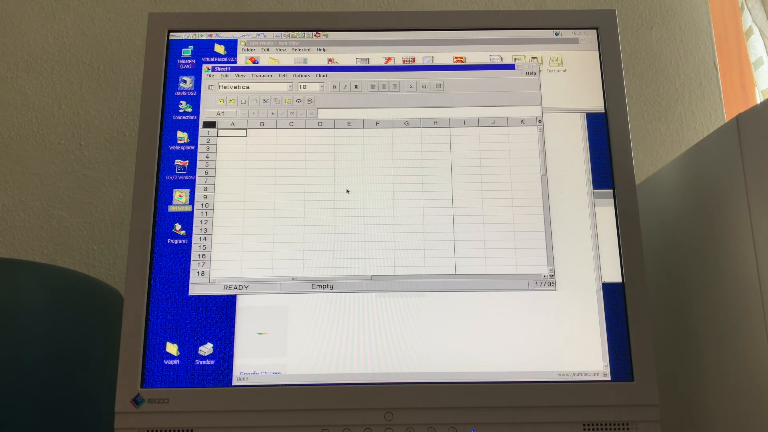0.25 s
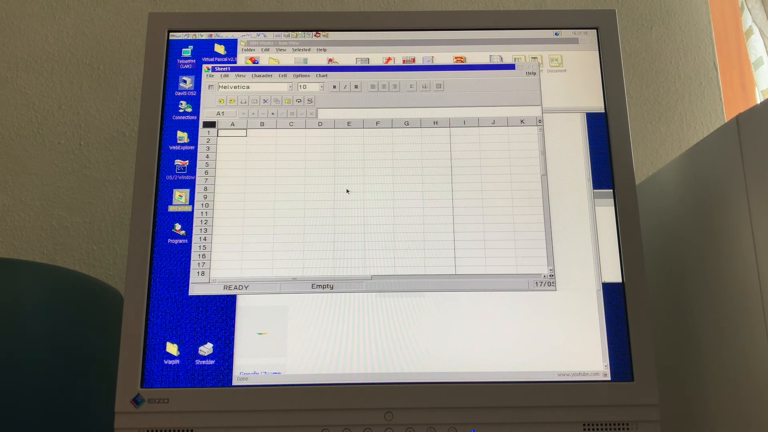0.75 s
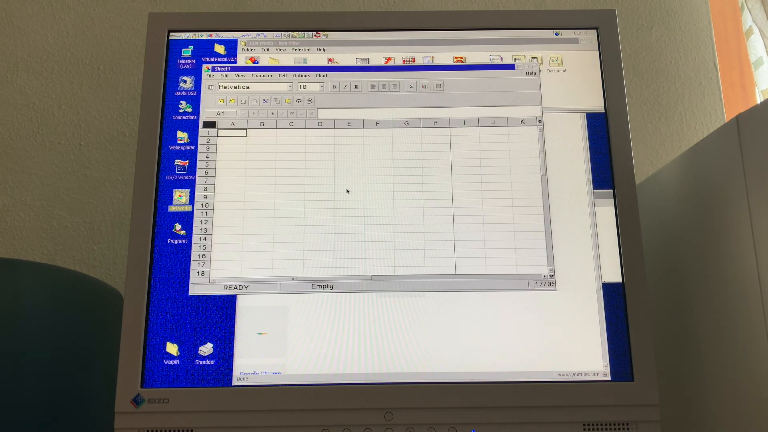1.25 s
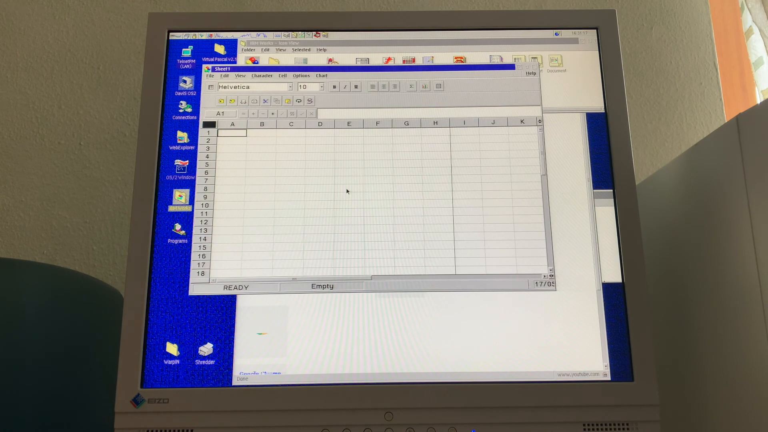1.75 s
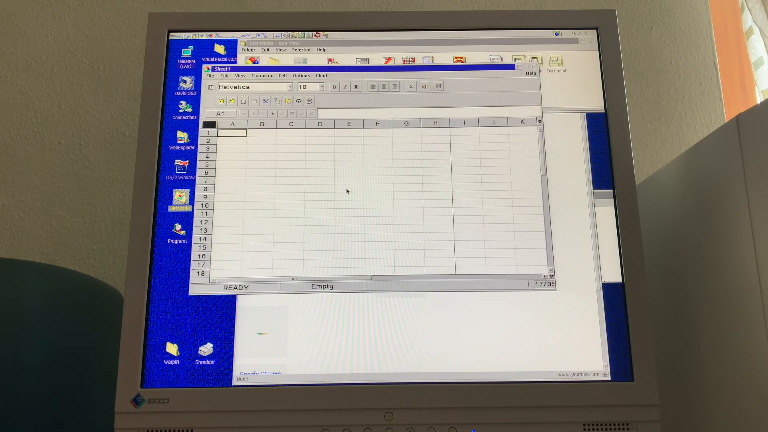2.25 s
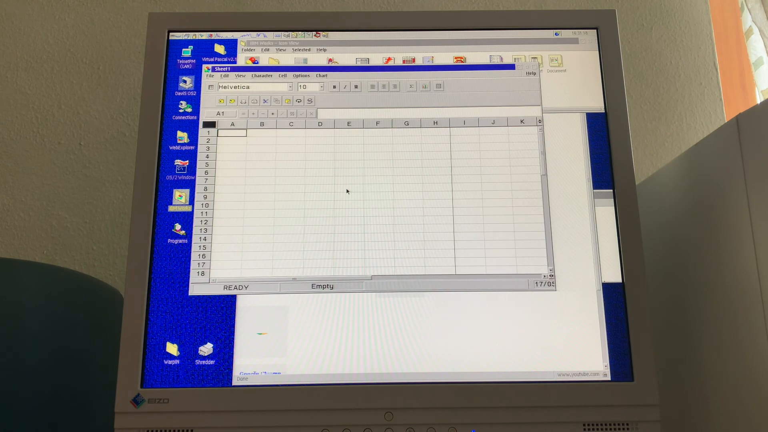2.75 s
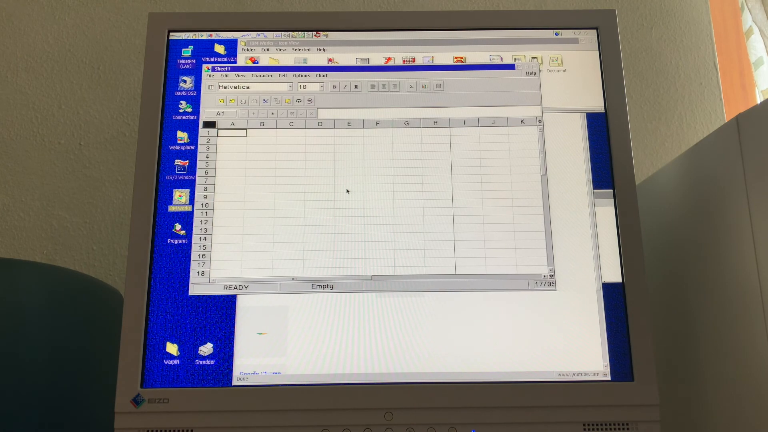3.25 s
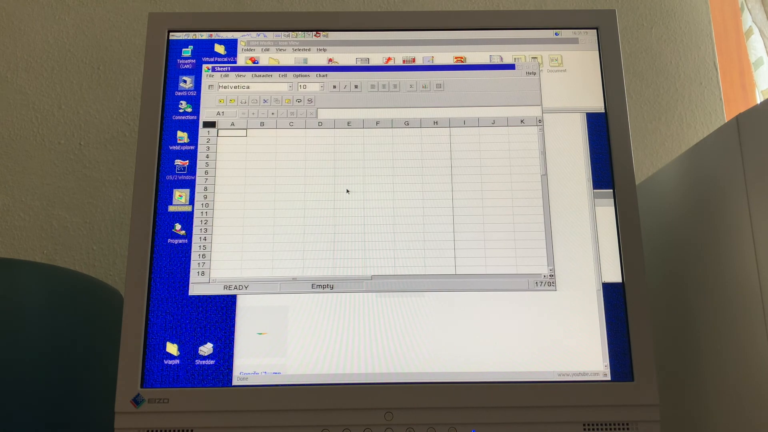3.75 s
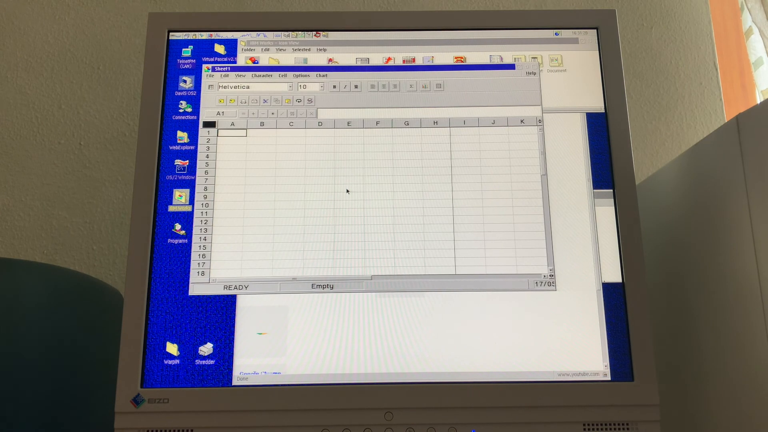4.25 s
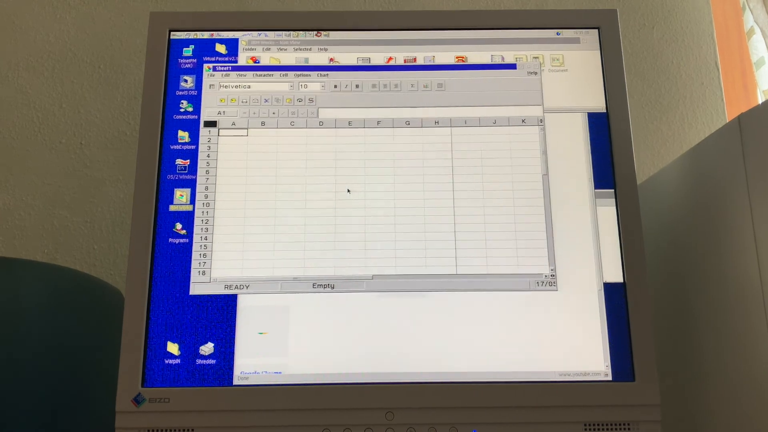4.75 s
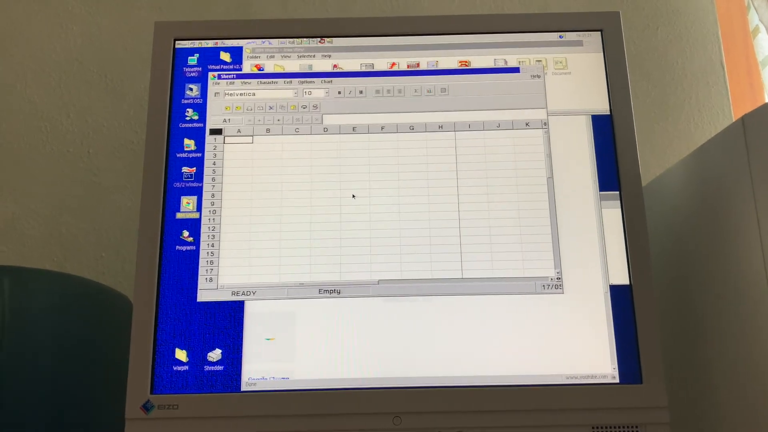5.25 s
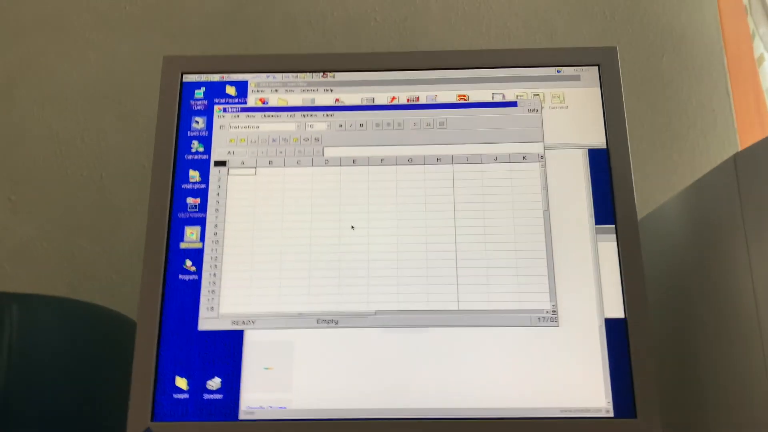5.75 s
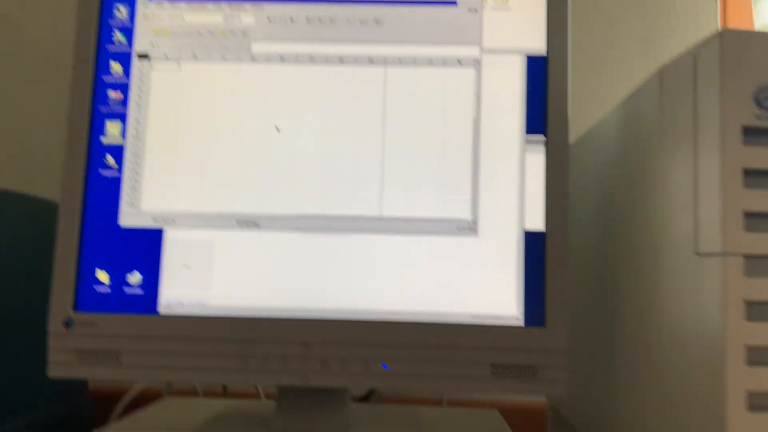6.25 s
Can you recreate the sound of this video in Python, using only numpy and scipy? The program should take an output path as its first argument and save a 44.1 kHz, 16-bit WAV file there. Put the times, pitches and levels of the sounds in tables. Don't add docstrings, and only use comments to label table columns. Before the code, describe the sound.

In a quiet room, a computer case beside a monitor whirs continuously: soft airy fan rush, low hum, glassy high whine and hiss that beats slowly. A drive ticks once early on. Later the hand holding the microphone shifts, giving small snaps, rubs and a dull thump. Finally the microphone swings towards the case, the whine grows brighter and stronger, and a hard rub with sharp clicks closes it.

```python
import sys
import numpy as np
from scipy import signal
from scipy.fft import rfft, irfft
from scipy.io import wavfile
from scipy.ndimage import uniform_filter1d

SR = 44100
rng = np.random.default_rng(int(sys.argv[2]) if len(sys.argv) > 2 else 0)


def to_wav(s):
    ch = np.atleast_2d(s).T
    pcm = np.round(np.clip(ch, -1, 1) * 32767)
    wavfile.write(sys.argv[1], SR, pcm.astype(np.int16))


def gain_from_db(level_db):
    decades = np.asarray(level_db, float) / 20
    return 10 ** decades


N = 287091
T = np.arange(N) / SR
HZ = np.fft.rfftfreq(N, 1 / SR)

# peak_s, level_db, pitch_hz, half_length_s
BUILDING_BUMPS = [
    (1.12, -47.5, 59, .12),
    (1.46, -53, 48, 0.092),
    (3.5, -49, 82, 0.049),
    (4.25, -49.5, 62, 0.14),
    (3.85, -52, 62.5, .1),
    (5.72, -48, 76.5, 0.065),
    (1, -52, 137, 0.045),
]
# pitch_hz, density_db_per_hz
RUMBLE = [(25, -104), (38, -73.5), (60, -75.5), (90, -79.5), (110, -77), (165, -74), (210, -83), (245, -83),
          (300, -92.5), (350, -102)]
# pitch_hz, width_hz, level_db
ROOM_TONES = [(66.4, 15, -65.5), (46.7, 5, -70.5), (137, 2.9, -72), (195, 6.5, -70.5), (222.4, 17, -72.5),
              (289, 41, -75.5)]
# time_s, level_db
SWELL = [(0, -6), (.7, -5), (1.1, -3), (1.5, -4), (1.9, -4.5), (2.9, -9.5), (3.7, -5), (4.1, -2), (4.5, -5),
         (4.8, -12), (5.2, -3.5), (5.75, -3), (6.1, -8), (6.51, -3)]
# pitch_hz, level_db
SHAFTS = [(71.4, -67), (90.2, -61), (120.1, -66), (158.3, -71), (166.9, -66), (200, -74), (217.7, -68),
          (236.1, -66), (308, -78)]

# time_s, share_0_to_1
TURN = [(0, 0), (4.45, 0), (4.75, 1), (5.7, 1), (6.2, 0), (6.51, 0)]
# time_s, share_0_to_1
NEARNESS = [(0, 0.01), (5.75, 0), (5.95, 0.2), (6.2, 0.85), (6.51, 1)]
# pitch_hz, lead_radians
LEAD = [(30, .5), (250, .65), (430, 1.4), (750, 3.3), (950, 5.2), (1300, 7.7), (2050, 7.9), (2650, 9.3),
        (2800, 9.6), (2950, 9.55), (3100, 9.55), (3250, 9.9), (3500, 10.6), (3850, 10.7), (4080, 12.3),
        (4500, 12.6), (5000, 13.4), (5400, 13.2), (5700, 14.1), (6100, 12.9), (6900, 13.5), (7350, 14.2),
        (7580, 14.5), (7800, 15.1), (8100, 15.5), (8300, 15.48), (8500, 15.7), (8800, 16.17), (9050, 16.05),
        (9400, 16.7), (9580, 16.4), (9750, 17.4), (10000, 17.3), (10800, 18.85), (11400, 19.95),
        (12600, 21), (12950, 21.9), (13850, 22.1), (14120, 22.7), (14300, 22.4), (14500, 23.1),
        (15000, 25.1)]
# pitch_hz, likeness_0_to_1
LIKENESS = [(60, .97), (250, .93), (700, .4), (1100, .15), (1500, .62), (2200, .7), (2560, .58), (2700, .4),
            (2850, .8), (3050, .66), (3300, .8), (3900, .35), (4300, .62), (4900, .3), (5400, .3),
            (6800, .55), (8000, .96), (9000, .96), (9650, .45), (10900, .97), (12200, .85), (13000, .97)]
# pitch_hz, left_minus_right_db
TILT = [(250, 0), (600, -1), (950, -7), (1300, -4), (1700, -1), (3000, 0), (4000, -1.5), (4500, -.5),
        (5250, -4.5), (5700, -3), (6000, -1), (6250, -3), (7000, 0)]
# pitch_hz, level_db, extra_lead_radians
NEAR = [(1500, 0, 0), (2350, -1, -.6), (2520, -6, -1.6), (2700, 0, -1.8), (3100, -1, -1.9), (3350, 0, -2.1),
        (3700, 2, -1.5), (3950, 1, -4.4), (4200, 1, -2.4), (4450, -3, -1.6), (4750, -2, -3.1),
        (5100, 0, -4), (5400, 1, -3.9), (5750, -4, -2), (6050, 2, -1.5), (6300, 0, -.7), (7250, -1, -.6),
        (7650, 8, -.2), (7900, -5, 0), (8700, -1, 0), (9400, 4, 0), (10400, 4, 0), (11200, 1, .4),
        (11900, 0, 0), (12400, 2, 0), (13450, -5, 0), (14050, -9, 0), (14400, 5, 0), (15100, 0, 0),
        (15250, -14, 0)]
# pitch_hz, left_db, right_db
SHADE = [(1130, 0.5, 0), (1670, 2, 3), (2200, 3, 2.5), (2600, 1.5, 2.5), (3350, -3.5, 3), (3750, -2, 3),
         (4400, -4, 4.5), (5000, -1, 5.5), (5500, -10, 1.5), (6030, -25, 5.5), (7100, 1, 0)]

# peak_s, level_db, pitch_hz, half_length_s
THUMPS = [
    (5.499, -32, 62, .017),
    (6.4855, -36, 110, .006),
]
# ping_peak_s, ping_db, knock_db, knock_hz, knock_delay_s
SNAPS = [(4.6145, -42, -38, 230, .007), (4.7195, -32, -42, 520, .005), (4.838, -50, -32, 450, .0035),
         (4.8445, -60, -43, 170, .002), (5.0115, -39, -33, 330, .0015), (5.065, -46, -48, 300, .003),
         (5.467, -54, -44, 540, .001), (4.515, -56, -47, 220, .001), (4.369, -48, -50, 520, -.003),
         (4.389, -51, -50, 330, .002), (4.422, -50, -52, 300, .003), (5.551, -49, -52, 480, .003),
         (5.300, -51, -43, 470, .001), (6.474, -37, -39, 350, .001), (6.4782, -25.5, -28, 170, -.0008),
         (6.494, -33, -33, 150, .006), (6.5017, -37, -33, 330, .0001), (6.5085, -37, -50, 300, -.002)]
# time_s, level_db
RUBS = [
    [(4.355, -78), (4.367, -47.5), (4.43, -55), (4.47, -56.5), (4.537, -51.5), (4.56, -67)],
    [(5.45, -65), (5.468, -55), (5.484, -61), (5.514, -55), (5.59, -60), (5.61, -78)],
    [(6.467, -74), (6.471, -42), (6.476, -37.5), (6.51, -40.5)],
    [(5.47, -66), (5.5, -56), (5.588, -57.5), (5.602, -79)],
]
# pitch_hz, level_db
RUB_COLOUR = [(90, -23), (200, 2.5), (550, 13), (700, -5.5), (900, 8.5), (1150, -0.5), (1500, 3.5)]
# pitch_hz, width_hz, level_db
RUB_FOCUS = [(795, 220, 16.5), (548, 140, 19), (750, 180, 12), (1090, 580, 16)]

# start_s, level_db, length_s
TICK = [
    (2.3034, -40.5, 0.0018),
    (2.3067, -50, 0.0083),
    (2.317, -52, .005),
]
# pitch_hz, width_hz, level_db
CASE = [(1000, 480, -3.5), (1860, 90, 5), (2620, 180, -3), (3100, 160, -1), (3500, 230, -1),
        (4000, 300, -8), (4370, 300, -3), (4750, 250, -6), (5720, 500, -10.5), (7000, 600, -5)]

# pitch_hz, density_db_per_hz
RUSH = [(200, -96), (360, -98), (500, -91), (680, -95), (900, -91), (1090, -97), (1300, -93), (1700, -92.5),
        (1900, -94.5), (2200, -89.5), (2480, -95), (2700, -96), (2900, -95), (3200, -97.5), (3700, -98),
        (4300, -102.5), (4550, -107), (4900, -106), (5300, -104), (5600, -109.5), (5900, -112.5),
        (6300, -112), (6600, -107)]
# pitch_hz, level_db
BLADE = [(472.6, -67), (944.8, -69)]
# pitch_hz, width_hz, level_db
BLADE_HUMPS = [(466.5, 53, -72.5), (643, 6.1, -78)]
# pitch_hz, level_db
FAN_TONES = [(471, -66), (945, -68), (1244, -76), (1402, -78), (1558, -75), (1583, -72), (1607, -76),
             (1674, -80), (1747, -77), (2151, -61), (2318, -76), (2387, -77), (2409, -76), (2525, -72),
             (2894, -82), (2977, -78), (3004, -77), (3063, -72), (3117, -75), (3456, -78), (3561, -80),
             (4673, -83), (4702, -87), (4861, -86), (5192, -83), (1949, -76), (2090, -77), (2338, -75),
             (2672, -79)]

# pitch_hz, density_db_per_hz
HISS = [(5200, -112), (6000, -112), (6400, -107.5), (6700, -100.5), (7100, -97), (7650, -97), (7900, -106),
        (8150, -99), (8700, -96), (9600, -101), (10400, -98), (11000, -98.5), (12300, -89), (13300, -95),
        (14000, -97), (14200, -107), (14350, -108), (14550, -102), (14800, -112), (15050, -107),
        (15400, -103), (15720, -102)]
# multiple_of_slot_rate, then level_db at each of the five sidebands
WHINE = [(11, -100, -84, -78, -81, -100), (12, -100, -80, -81, -82, -100), (13, -100, -73, -73, -82, -100),
         (14, -100, -88, -59, -76, -100), (15, -86, -88, -75, -77, -100), (16, -87, -71, -71, -74, -84),
         (17, -86, -66, -66, -76, -82), (18, -91, -72, -75, -76, -100), (19, -100, -78, -73, -80, -100),
         (20, -84, -71, -87, -71, -90), (21, -83, -75, -85, -88, -100), (22, -84, -83, -79, -71, -100),
         (23, -81, -62, -74, -71, -100), (24, -77, -70, -75, -70, -85), (25, -100, -73, -79, -72, -100),
         (26, -100, -71, -78, -80, -100), (27, -97, -80, -85, -76, -100), (28, -100, -89, -100, -85, -100),
         (29, -100, -93, -100, -78, -100)]
SLOT_HZ, SIDEBANDS_HZ = 519.25, [-158.4, -72.3, 0, 72.3, 158.4]
# pitch_hz, level_db
SECOND_DRIVE = [(5860, -86), (7082, -78), (7596, -73), (7666, -80), (7738, -81), (7873, -82), (8220, -76),
                (8627, -79), (9114, -79), (9160, -80), (9410, -75), (9534, -82), (9927, -80), (10199, -78),
                (10301, -76), (10446, -74), (10573, -80), (11092, -83), (11483, -76), (11612, -73),
                (11633, -73), (11754, -71), (11857, -64), (12029, -72), (12376, -68), (12546, -71),
                (12651, -71), (12896, -74), (14077, -76), (15114, -84)]
# peak_s, level_db, pitch_hz, half_length_s
BEAMS = [(6.15, -64, 3060, 0.24), (6.16, -66, 6232, 0.11), (6.32, -67, 6680, 0.21), (6.08, -60, 7530, 0.24),
         (6.21, -56, 7790, 0.12), (6.07, -59, 8308, 0.09), (6.42, -65, 8380, 0.19), (5.87, -62, 8828, 0.24),
         (6.32, -67, 8898, 0.16), (6.36, -64, 9347, 0.16), (6.4, -60, 9418, 0.08), (6.32, -64, 9793, 0.17),
         (6.03, -61, 10834, 0.2), (6.15, -63, 10978, 0.27), (6.41, -64, 11351, 0.09),
         (6.05, -63, 11497, 0.19), (5.86, -60, 12011, 0.1), (6.39, -59, 12391, 0.19),
         (6.06, -58, 12537, 0.1), (5.84, -67, 12799, 0.16), (6.46, -62, 12906, 0.04),
         (6.36, -63, 13053, 0.12)]
BEATS_HZ = [2005, 2150, 7266]
# pitch_hz, level_db, in_step_s
SPINDLES = [
    [(2002.01, -73.5, 2.9), (2002.45, -62.0, 2.995), (2003.64, -59.0, 2.745), (2004.07, -64.0, 2.972),
     (2004.38, -62.0, 2.972), (2006.78, -75.5, 3.1), (2007.31, -64.0, 2.924), (2007.58, -66.0, 2.852)],
    [(2147.12, -72.5, 3.113), (2148.29, -73.0, 3.014), (2148.76, -68.0, 2.698), (2149.06, -70.0, 3.119),
     (2149.6, -77.0, 4.245), (2151.8, -78.0, 3.179), (2151.98, -68.0, 2.858), (2152.4, -68.0, 2.891)],
    [(7261.67, -69.0, 3.002), (7265.02, -73.0, 2.809), (7267.25, -67.0, 2.945), (7267.85, -72.0, 3.054),
     (7267.93, -72.0, 2.848), (7268.44, -69.5, 2.86), (7269.76, -62.5, 2.885), (7270.05, -71.5, 2.974),
     (7274.73, -78.5, 2.985), (7276.36, -75.0, 2.96), (7279.83, -79.0, 2.986)],
]
GROUP_DB, GROUP_TURNED_DB, GROUP_NEAR_DB = [0.5, 0.9, 0], [4, 1, -1], [6.5, 10.5, 4.5]


def evened(x):
    return x / np.sqrt(np.mean(x ** 2) + 1e-20)


def read(points, hz):
    f, value = np.transpose(points)
    return np.interp(np.log(hz + 1), np.log(f + 1), value)


def columns(rows):
    s, *values = np.transpose(rows)
    if s[0] > 1:
        return [np.interp(T, s, v, left=-120, right=-120) for v in values]
    return [np.interp(T, s, v) for v in values]


def add(mix, s, sound):
    part = mix[round(s * SR) - len(sound) // 2:][:len(sound)]
    part += sound[:len(part)]


def patchy_noise(patch_db):
    frames, hz = N // 256 + 5, np.fft.rfftfreq(1024, 1 / SR)
    a, b, c, d, patches = rng.standard_normal((frames, 513, 5)).T
    patches = uniform_filter1d(patches, size=10, axis=0)
    patches = evened(uniform_filter1d(patches, size=12, axis=1))
    same = np.clip(read(LIKENESS, hz), 0, 1)[:, None]
    left = a + 1j * b
    right = same * left + np.sqrt(1 - same ** 2) * (c + 1j * d)
    z = np.array([left, right]) * gain_from_db(patch_db * patches)
    return evened(signal.istft(z, nperseg=1024, noverlap=768)[1][:, :N])


def coloured(x, colour):
    inside = (HZ > colour[0][0]) & (HZ < colour[-1][0])
    return irfft(rfft(x) * gain_from_db(read(colour, HZ)) * inside * np.sqrt(SR / 2), N)


def humps(white, peaks):
    density = sum(gain_from_db(db) ** 2 / w / (1 + (2 * (HZ - f) / w) ** 4) for f, w, db in peaks)
    return irfft(rfft(white) * np.sqrt(density * SR / 2), N)


def tones(lines, partner_db, spread_hz, count=7):
    spectrum, partner = np.zeros(len(HZ), complex), np.arange(count) > 0
    for (hz, db), (place, size, phase) in zip(lines, rng.random((len(lines), 3, count))):
        shares = gain_from_db(partner * (partner_db - 6.7 * size))
        shares = shares / np.linalg.norm(shares)
        pitches = hz + spread_hz * partner * (2 * place - 1)
        bins = np.round(pitches * N / SR).astype(int)
        np.add.at(spectrum, bins, gain_from_db(db) * shares * np.exp(2j * np.pi * phase))
    return irfft(spectrum, N) * N / np.sqrt(2)


def wavelet(db, hz, half_s):
    t = np.arange(-SR // 4, SR // 4) / SR
    return gain_from_db(db) * np.exp(-(t / half_s) ** 2) * np.cos(2 * np.pi * hz * t)


def knock(db, hz, cycles, sharpness):
    age = np.maximum(1 + np.arange(-SR // 20, SR // 20) / SR * hz / cycles, 1e-3)
    swell = (age * np.exp(1 - age)) ** sharpness
    return gain_from_db(db) * swell * np.cos(2 * np.pi * cycles * np.log(age))


def panned(pair, db):
    return pair * gain_from_db(np.array([db / 2, -db / 2]))


def ports(spectrum, near=0):
    f, radians = np.transpose(LEAD)
    near_f, near_db, near_radians = np.transpose(NEAR)
    lead = np.interp(HZ, f, radians) + near * np.interp(HZ, near_f, near_radians)
    colour = gain_from_db(near * np.interp(HZ, near_f, near_db))
    tilt_db = read(TILT, HZ) / 2
    return irfft(spectrum * colour * np.array([gain_from_db(tilt_db), gain_from_db(-tilt_db) * np.exp(1j * lead)]), N)


def approached(x):
    share, spectrum = np.clip(columns(NEARNESS)[0], 0, 1), rfft(x)
    return sum(np.maximum(1 - 2 * abs(share - near), 0) * ports(spectrum, near) for near in (0, .5, 1))


def shaded(pair, turn):
    f, *db = np.transpose(SHADE)
    gains = gain_from_db(np.array([np.interp(HZ, f, d) for d in db]))
    return pair + turn * irfft(rfft(pair) * (gains - 1), N)


def through_housing(pair):
    left, right = pair
    return np.array([left, np.append(right[12:], right[-12:][::-1])])


def building_bumps():
    bumps = np.zeros(N)
    for s, *bump in BUILDING_BUMPS:
        add(bumps, s, wavelet(*bump))
    return bumps


def room_rumble(white):
    desk_hum = tones([(58.3, -53)], partner_db=-10.5, spread_hz=1.5)
    rumble = coloured(white, RUMBLE) + humps(white, ROOM_TONES) + desk_hum
    return gain_from_db(columns(SWELL)[0]) * rumble + tones(SHAFTS, partner_db=-17.5, spread_hz=1.5)


def grip_snaps():
    snaps, ping_hz = np.zeros(N), 960
    for s, *thump in THUMPS:
        add(snaps, s, wavelet(*thump))
    for s, ping_db, knock_db, knock_hz, delay in SNAPS:
        add(snaps, s, wavelet(ping_db, ping_hz, 1.66 / ping_hz))
        add(snaps, s + delay, knock(knock_db, knock_hz, cycles=1.26, sharpness=6.8))
    return snaps


def skin_rubs():
    grain_db = 2.2 * rng.exponential(1, N // 64 + 1).repeat(64)[:N]
    grains = rng.standard_normal((2, N)) * gain_from_db(grain_db)
    grains = grains + 2.5 * grains.sum(0)
    spectrum = rfft(evened(coloured(grains, RUB_COLOUR)))
    rubs = np.zeros((2, N))
    for (f, w, db), rub in zip(RUB_FOCUS, RUBS):
        focus = gain_from_db(db / (1 + (2 * (HZ - f) / w) ** 2))
        rubs += evened(irfft(spectrum * focus, N)) * gain_from_db(columns(rub)[0])
    return rubs


def drive_tick():
    noise = rng.standard_normal((3, N))
    start_s, start_db, _ = TICK[0]
    cracks = sum((T > s) * gain_from_db(db) * np.exp(-((T - s) / length) ** 2) for s, db, length in TICK)
    ring = (T > start_s) * gain_from_db(start_db - 5.5 - 60 * abs(T - start_s) / 0.083)
    case = sum(gain_from_db(db) / (1 + (2 * (HZ - f) / w) ** 2) for f, w, db in CASE)
    return 2 * irfft(rfft((noise[0] + 1.15 * noise[1:]) * (cracks + ring)) * case, N)


def fans(white, turn, near):
    lines = [line for line in FAN_TONES if abs(line[0] - BEATS_HZ[1]) > 9 and line[0] > 1000]
    steady = tones(lines, partner_db=-2.0, spread_hz=5.0) + tones(BLADE, partner_db=-16, spread_hz=1.1)
    air = coloured(white, RUSH) + humps(white, BLADE_HUMPS)
    return gain_from_db(0.82 + 0.2 * turn + 2 * near) * (air + steady)


def spindle_group(group, shift_hz=0):
    centre_hz, slow = BEATS_HZ[group], T[::32]
    beat = sum(gain_from_db(db) * np.exp(2j * np.pi * (hz - centre_hz) * (slow - s)) for hz, db, s in SPINDLES[group])
    carrier = np.exp(2j * np.pi * (centre_hz + shift_hz) * T)
    return np.sqrt(2) * (np.interp(T, slow, beat) * carrier).real


def drive_whine(white, near):
    lines = [(k * SLOT_HZ + side, db) for k, *row in WHINE for side, db in zip(SIDEBANDS_HZ, row)]
    lines = [line for line in lines if abs(line[0] - BEATS_HZ[2]) > 9]
    steady = tones(lines + SECOND_DRIVE, partner_db=-1.0, spread_hz=8.0)
    copies = spindle_group(2, -158.3) * gain_from_db(-11.5) + spindle_group(2, 158.3) * gain_from_db(-16)
    return gain_from_db(1.58 + 2.5 * near) * (coloured(white, HISS) + steady + copies)


def beams():
    late = T[T > 5.2]
    flares = sum(gain_from_db(db - 6) * np.exp(-((late - s) / half_s) ** 2) * np.cos(2 * np.pi * hz * late)
                 for s, db, hz, half_s in [*BEAMS, (5.95, -67, 4673, .07)])
    return np.sqrt(2) * np.append(np.zeros(N - len(late)), flares)


def computer():
    turn, near = columns(TURN)[0], columns(NEARNESS)[0]
    white = patchy_noise(patch_db=2.0)
    levels = zip(GROUP_DB, GROUP_TURNED_DB, GROUP_NEAR_DB)
    strong = [spindle_group(group) * gain_from_db(db + turned_db * turn + near_db * near)
              for group, (db, turned_db, near_db) in enumerate(levels)]
    side = spindle_group(0, 240.19) * gain_from_db(-8.5 + 1.1 * turn + 6.7 * near)
    steady = approached(room_rumble(white) + drive_whine(white, near) + strong[2] + beams())
    air = panned(approached(fans(white, turn, near)), -1.5 * turn)
    beating = panned(approached(strong[0] + strong[1] + side), -6 * turn)
    return shaded(steady + air, turn) + beating


def scene():
    shaking = through_housing(building_bumps() + grip_snaps() + skin_rubs())
    return shaking + drive_tick() + computer()


def low_pass(x):
    return signal.sosfilt(signal.butter(12, 15750, fs=SR, output="sos"), x)


def record(dry):
    return low_pass(dry)


dry = scene()
out = record(dry)
to_wav(out)
```